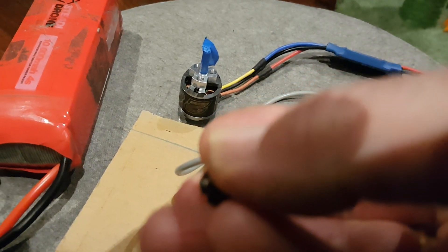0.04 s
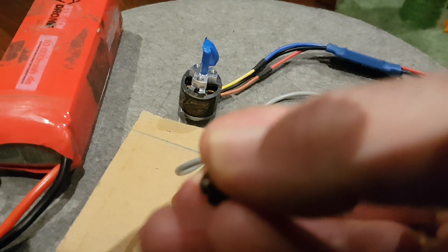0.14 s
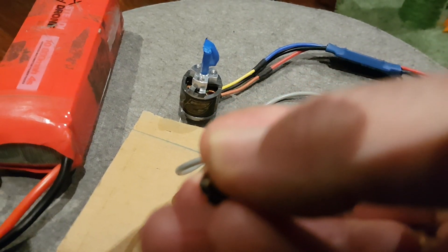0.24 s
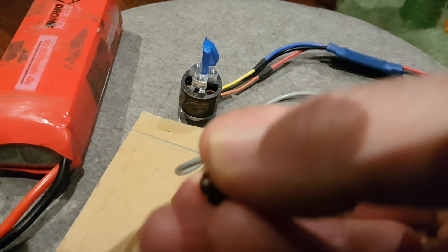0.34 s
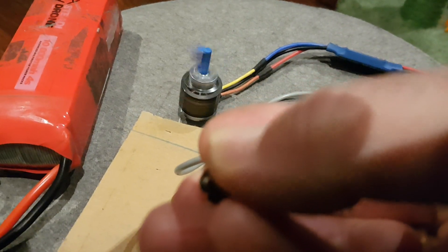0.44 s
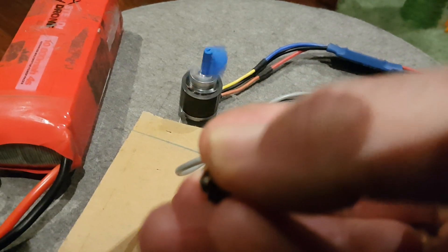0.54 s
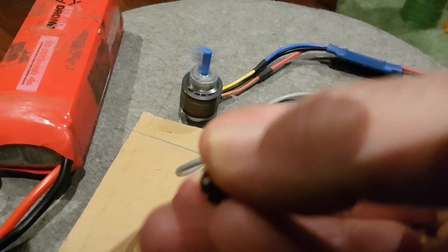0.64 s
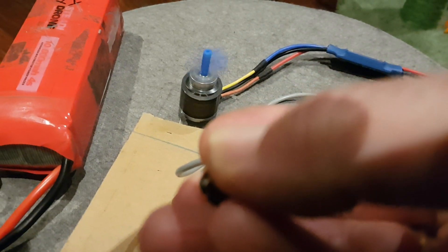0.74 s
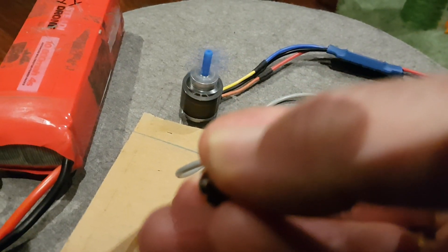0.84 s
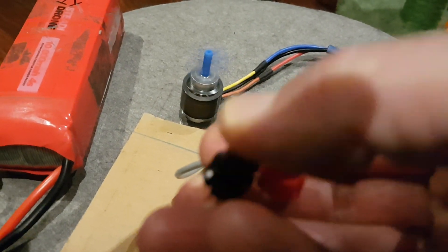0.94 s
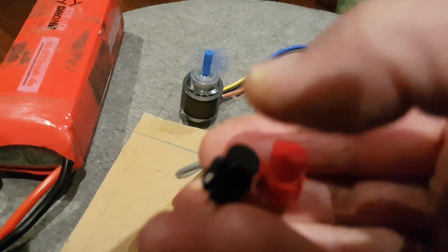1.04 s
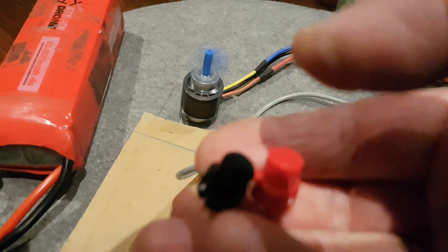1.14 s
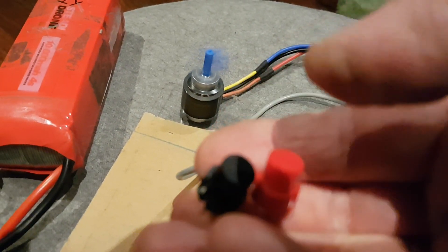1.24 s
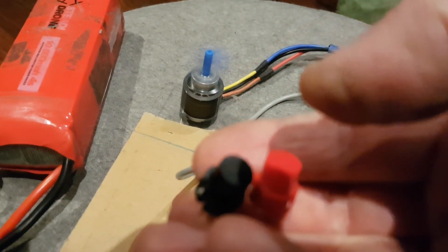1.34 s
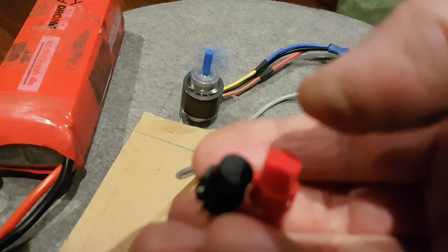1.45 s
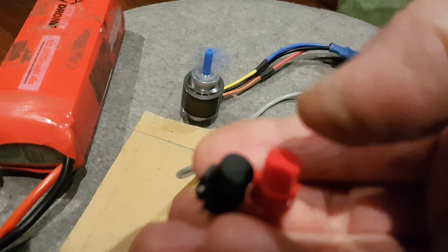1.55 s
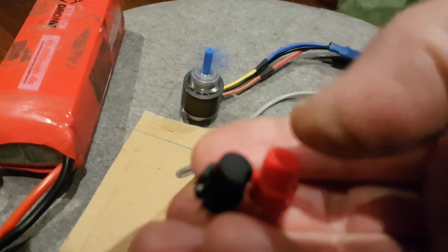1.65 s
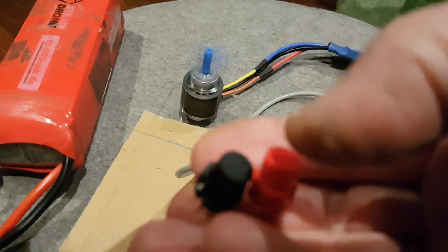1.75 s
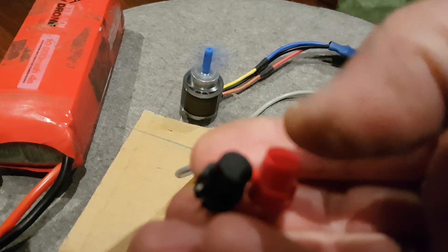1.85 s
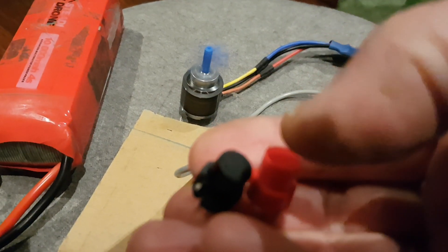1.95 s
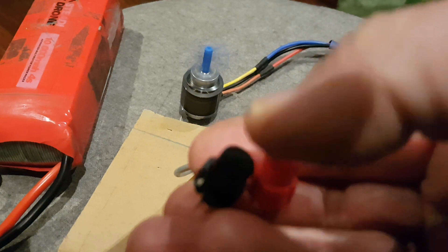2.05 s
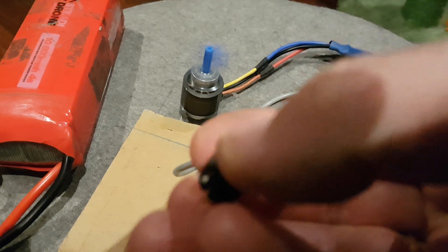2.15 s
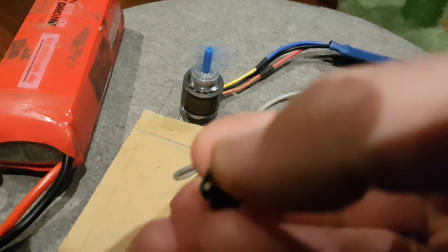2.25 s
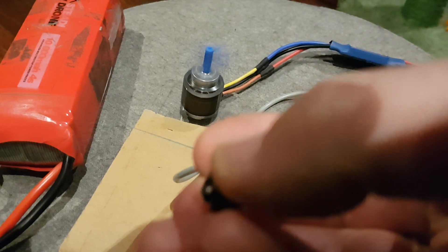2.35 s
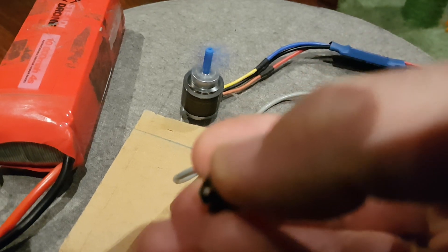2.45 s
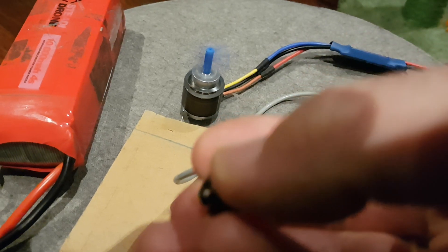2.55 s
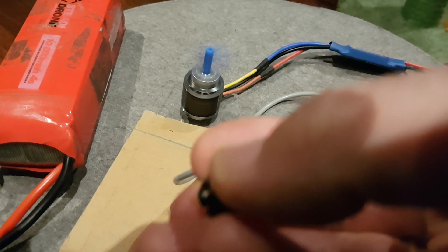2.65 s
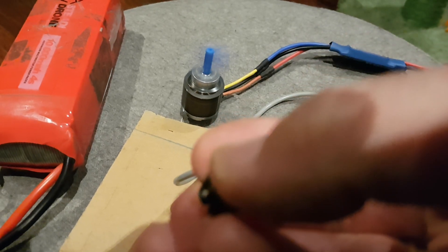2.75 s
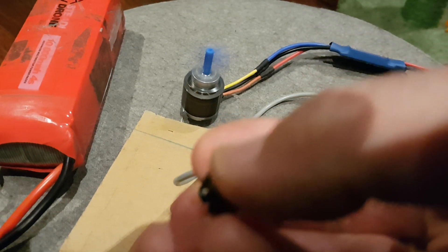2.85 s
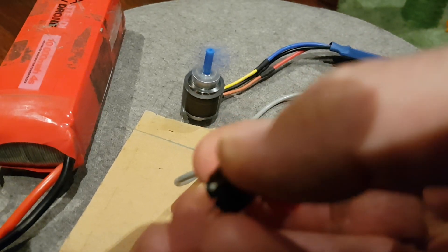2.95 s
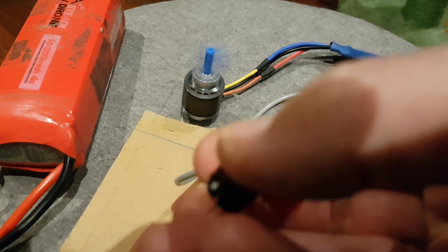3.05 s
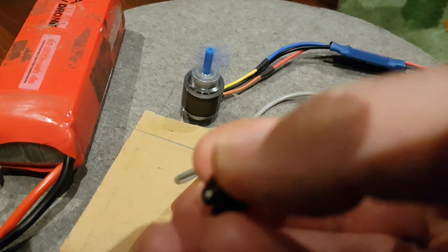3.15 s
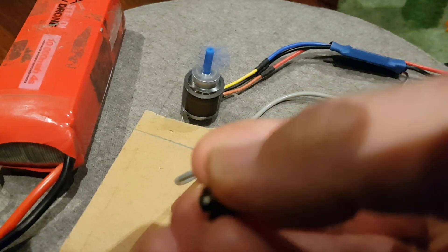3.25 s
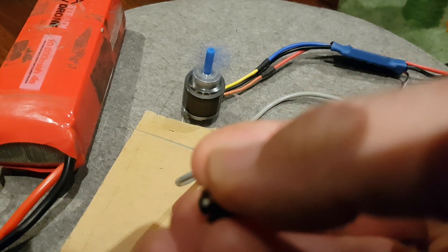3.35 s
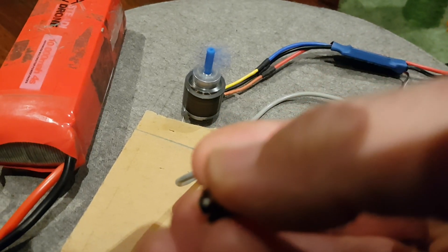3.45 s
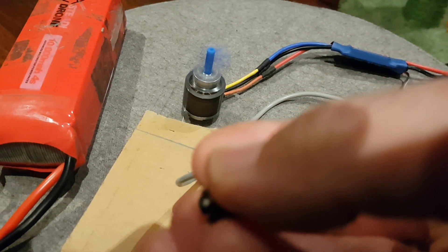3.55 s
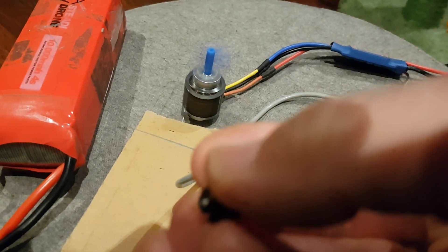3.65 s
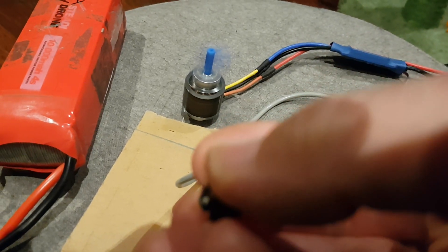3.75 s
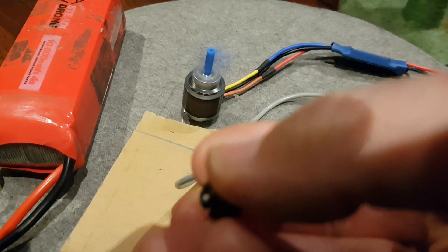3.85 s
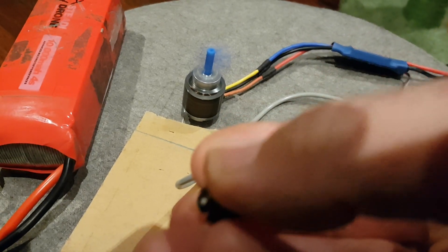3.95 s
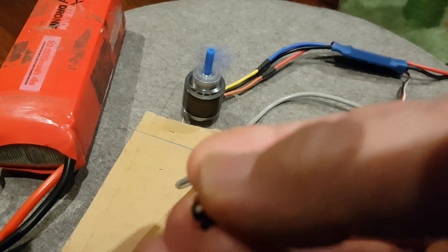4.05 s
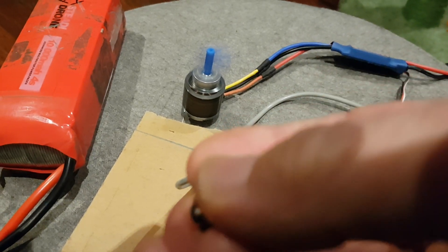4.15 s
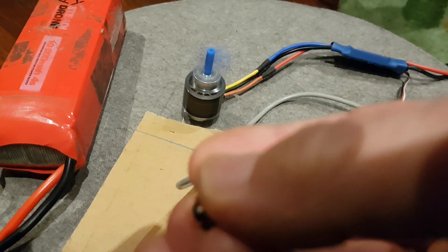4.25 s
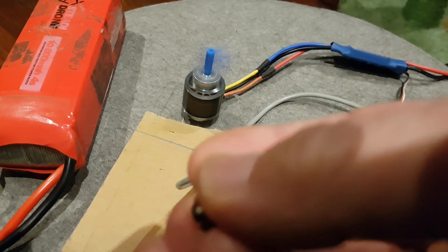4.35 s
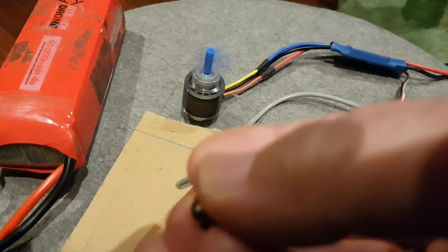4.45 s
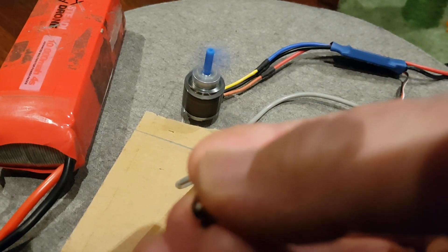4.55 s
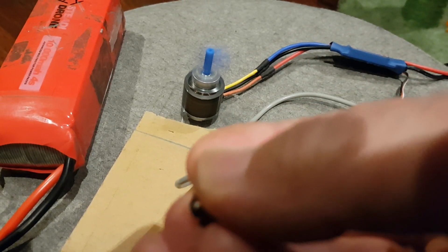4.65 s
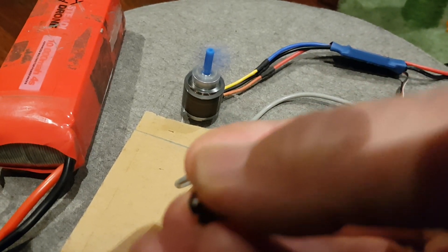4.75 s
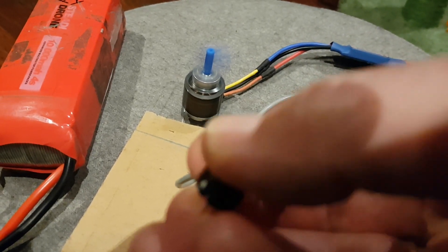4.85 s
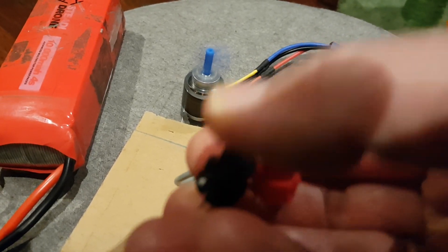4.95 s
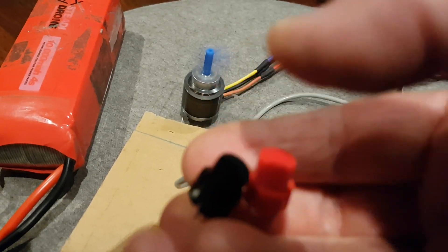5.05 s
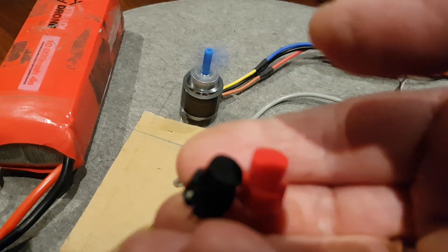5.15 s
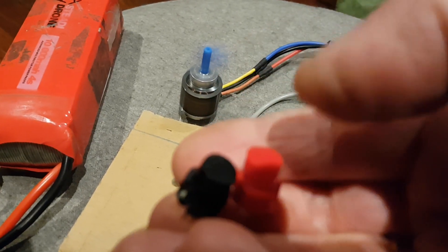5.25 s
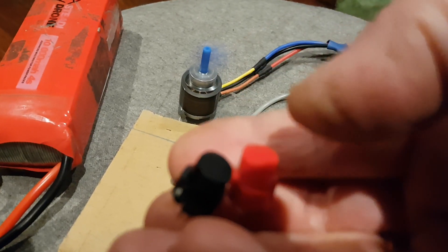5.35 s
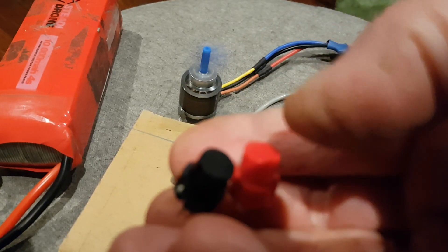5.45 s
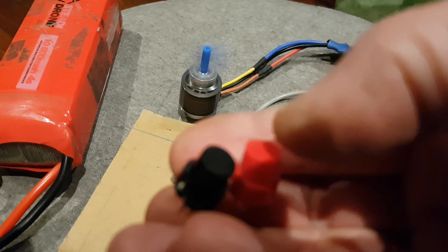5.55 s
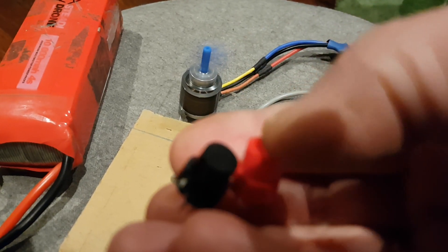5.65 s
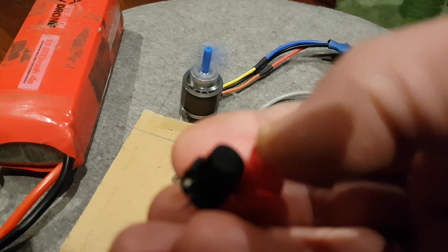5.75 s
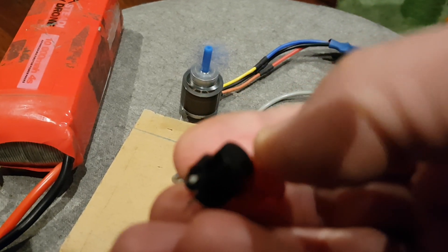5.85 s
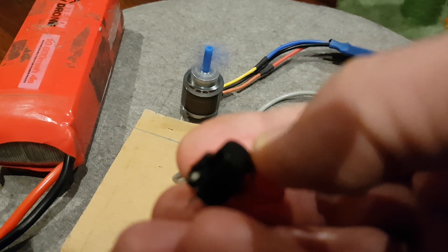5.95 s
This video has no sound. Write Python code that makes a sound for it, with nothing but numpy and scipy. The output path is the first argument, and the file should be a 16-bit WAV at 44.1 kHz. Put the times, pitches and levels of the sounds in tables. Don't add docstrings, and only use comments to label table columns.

```python
import sys
import numpy as np
from scipy import signal
from scipy.fft import rfft, irfft, next_fast_len
from scipy.io import wavfile
from scipy.ndimage import uniform_filter1d

SR = 44100
rng = np.random.default_rng(int(sys.argv[2]) if len(sys.argv) > 2 else 0)


def boost_factor(decibels):
    exponent = np.asarray(decibels, float) / 20
    return 10 ** exponent


def generate_wav(sig):
    pcm = np.round(np.clip(np.atleast_2d(sig).T, -1, 1) * 32767).astype(np.int16)
    wavfile.write(sys.argv[1], SR, pcm)


N = 264803
TIME = np.arange(N) / SR
HZ = np.fft.rfftfreq(next_fast_len(N + SR // 4), 1 / SR)
SIZE = 2 * (len(HZ) - 1)
TURN = 65536
ON_S, ODD_ON_S, LOCK_S = 0.412, 0.721, 0.773
PART_HZ, HIGH_HZ, FULL_HZ = 158, 182, 206


def shape(points):
    hz, db = np.transpose(points)
    return boost_factor(np.interp(np.log(HZ + 1), np.log(hz), db))


def rings(table):
    gain = 1
    for hz, width_hz, db in table:
        gain = gain * (1 + (boost_factor(db) - 1) / (1 + 2j * (HZ - hz) / width_hz))
    return gain


def colour(x, gain):
    return irfft(rfft(x, SIZE) * gain, SIZE)[:N]


def unit(x):
    return x / np.sqrt(np.mean(np.abs(x) ** 2))


def noise(points):
    return unit(colour(rng.standard_normal(N), shape(points)))


def walk(rate):
    k = int(SR / rate)
    held = np.repeat(rng.standard_normal(N // k + 1), k)
    return 1.309 * uniform_filter1d(uniform_filter1d(held, k), k)[:N]


def since(start_s, decay_s):
    return np.exp(-np.maximum(TIME - start_s, 0) / decay_s)


def per_turn(gains, turns, spread=1.0):
    phases = np.exp(2j * np.pi * spread * rng.random(TURN))
    table = np.fft.ifft(gains * phases) * TURN
    return table[..., (turns % 1 * TURN).astype(int)]


# pitch_hz, level_db
ROOM_TONE = [(15, -31), (25, -55), (33, -27), (175, -1.5), (270, -5), (301, 2), (335, -3.5), (545, -6.5),
             (624, -1), (734, -8), (2000, -17.5), (7110, -38), (16000, -33.5)]


def room():
    shared = noise(ROOM_TONE)
    return boost_factor(-62.5) * np.array([0.62 * shared + 1.32 * noise(ROOM_TONE) for _ in range(2)])


# start_s, peak_db, pitch_hz, t60_s
NUDGES = [
    (0.534, -48, 75, 0.015),
    (3.389, -49, 77, 0.044),
    (5.988, -56, 76, 0.041),
]


def bumps():
    out = np.zeros(N)
    for s, db, hz, t60 in NUDGES:
        t = np.maximum(TIME - s, 0)
        out += boost_factor(db + 17.5) * np.sin(2 * np.pi * hz * t) * np.exp(-np.log(1000) * t / t60)
    return out * np.array([[1.2], [0.8]])


# pitch_hz, level_db
PORT_BASS = [(25, -14), (70, -0.5)]
# pitch_hz, level_db
NEAR_PATH = [(60, -4), (250, -10), (500, 0), (1000, 2), (1250, -4.5), (2100, -3), (2500, -12.5),
             (3200, -13), (4500, -12.5), (6000, -10.5), (7000, -21), (10000, -21.5), (14500, -18.5),
             (16000, -28.5)]
# pitch_hz, width_hz, level_db
CAN_RINGS = [(536, 120, 6.6), (654, 11, 1.1), (930, 145, 5.3), (1083, 170, 2.2), (1407, 285, 5),
             (1994, 112, 6.2), (2280, 267, 5.7), (3880, 15, 0.87), (4555, 25.5, 10), (9860, 1130, 9.5),
             (14100, 220, 3.5)]


def path_to_phone():
    port_ring = 1 + 1.3 / (1 + 2j * (HZ - 15450) / 300)
    return shape(NEAR_PATH) * rings(CAN_RINGS) * shape(PORT_BASS) * port_ring


# time_s, shaft_hz
KNOB_TURNS = [(0.8, 157.5), (1.37, 152.6), (1.42, 155.9), (1.65, 155.9), (1.73, 154.2), (2.11, 154.6),
              (2.41, 153.4), (2.49, 156.4), (2.77, 176.3), (2.9, 179.8), (3.37, 178.6), (3.62, 187.4),
              (4.06, 187.3), (4.21, 188.7), (4.5, 196.8), (4.59, 206.1), (6.0, 206.1)]


def speed():
    hand_s, creep_hz, creep_rise_s, inertia_s = 0.07, 27.556, 0.05, 0.113
    asked = np.interp(TIME, *np.transpose(KNOB_TURNS))
    knob = uniform_filter1d(asked, size=int(hand_s * SR), mode="nearest")
    creep = creep_hz * (1 - 0.3 * since(ON_S, creep_rise_s))
    return knob - (knob - creep) * since(LOCK_S, inertia_s)


def shaft_turns(hz, blind, rush):
    jitter = 0.00018 * walk(20.) + 0.0303 * blind * walk(60.03) + 0.012 * rush * walk(120.)
    return np.cumsum(hz * (1 + jitter)) / SR


# shaft_hz, hum_db, left_minus_right_db
PAD_HUM = [(27, -65, 1), (64, -63, -12), (91, -51.5, -8), (147, -37, -7), (153, -39, -8),
           (174.2, -26, -6.5), (180, -32, -3.5), (193.5, -27.5, -5.5), (206, -29.5, -4),
           (205.8, -26.5, -4.5)]


def unbalance_hum(hz, turns):
    speeds, levels, pans = np.transpose(PAD_HUM)
    hum_db, pan_db = np.interp(hz, speeds, levels), np.interp(hz, speeds, pans)
    level = boost_factor(hum_db + 0.5 * walk(40.)) * np.sqrt(2)
    hum = (TIME > ON_S) * level * np.sin(2 * np.pi * turns + 0.12 * walk(40.))
    return colour(hum, shape(PORT_BASS)) * boost_factor(np.array([pan_db, -pan_db]) / 2)


# start_s, peak_db, bright_db
SNAPS = [(0.416, -47, 11), (0.447, -39, -13), (0.477, -34, -10), (0.517, -32.5, -16), (0.558, -35, -14),
         (0.595, -36.5, -14), (0.631, -55, -7), (0.715, -38, -19), (0.751, -55, -19), (0.767, -48, -15),
         (0.781, -41, 2), (0.799, -41, -12)]


def judder():
    out = np.zeros(N)
    t = np.arange(400) / SR
    for s, db, bright_db in SNAPS:
        i = int(s * SR)
        rough = rng.standard_normal(400) * np.exp(-t / 0.0044)
        knock = uniform_filter1d(unit(rough), size=6)
        dull = uniform_filter1d(uniform_filter1d(knock, size=16), size=16)
        out[i:i + 400] += boost_factor(db) * (dull + boost_factor(bright_db) * knock)
    return out


def lurching(blind, rush):
    snap_db, snap_s = 35, 0.014
    lurch = boost_factor((0.56 * blind + 1.1 * rush) * walk(110.3))
    jolts = 1
    for s, db, _ in SNAPS:
        jolts = jolts + boost_factor(db + snap_db) * (TIME > s) * np.exp(-np.abs(TIME - s) / snap_s)
    return lurch * jolts


# pitch_hz, level_db
AIR = [(25, -26), (60, -3.5), (120, 12.5), (200, 12), (600, -2.5), (1000, -5.5), (2000, -3), (4000, 3.5),
       (8000, 3.5), (12000, -18), (16000, -17.5)]
# pitch_hz, level_db
RATTLE = [(200, -24), (450, -51), (640, 10.5), (780, -5), (1000, 2.5), (1500, -18), (2350, -4.5),
          (3000, -14), (6000, -17), (9000, -40)]


def air_hiss(whine_db, gate, lurch, blind, rush):
    air = (1 - blind) * boost_factor(-4 * rush) * noise(AIR)
    return boost_factor(whine_db - 0.5) * gate * lurch * (air + 1.7 * blind * noise(RATTLE))


def fizz(whine_db, gate, blind, rush, load, full):
    running_db = whine_db - 4.5 + 15.7 * rush + 4.9 * load - full
    level = blind * boost_factor(SWITCH_BLIND_DB + 19.5) + (1 - blind) * boost_factor(running_db)
    return level * gate * noise([(9000, -12.5), (9900, -3), (10400, 2.5), (11000, 1), (16000, 3)])


# ball_pass_multiple, shaft_multiple, slow_db, fast_db
BALL_LINES = [(1, 0, -40, -6.5), (1, 1, -30, -1.5), (1, 2, -21, -9.5), (1, 3, -15, -11), (1, 4, -6, -34),
              (2, -2, -58, -20), (2, -1, -16, -12), (2, 0, -3.5, -3), (2, 1, -5.5, -10), (3, 0, -8.5, -7.5),
              (4, 0, -5.5, -23)]


def bearing(hz, turns):
    balls_per_turn = 3.178
    fast = np.clip((hz - 154) / 52, 0, 1)
    out = 0
    for balls, shaft, slow_db, fast_db in BALL_LINES:
        cycles = (round(balls) * balls_per_turn + round(shaft)) * turns + rng.random()
        out = out + boost_factor(slow_db + (fast_db - slow_db) * fast) * np.sin(2 * np.pi * cycles)
    return out * boost_factor(2.0 * walk(11.0))


SWITCH_BLIND_DB = -61.5


def switching_level(hz, load):
    held = 1 - since(LOCK_S, 0.02)
    running_db = -55 + 4.5 * load - 2 * np.log2(hz / FULL_HZ)
    return held * running_db + (1 - held) * SWITCH_BLIND_DB


SWITCH_LINES = [(1, 0), (1, 1), (1, 8), (1, 9), (1, 11), (1, 12), (1, 13), (1, 22), (1, 24), (1, 26),
                (1, 28), (1, 30), (1, -35), (1, -36), (2, 0), (2, -1), (2, 1), (2, -8), (2, -12), (2, -14),
                (2, -18), (2, -30)]
SWITCH_LINE_DB = [3, -16, -7.5, -7, -16, -4, -20, -8, -3, -14, -15, -3, -20.5, -22, -4, -14, -12, -9, -2.5,
                  -11, -14, -15]
WEAK_LINES = [
    np.arange(-6, 44),
    np.arange(-36, 2),
]
# time_s, pitch_hz
SWITCH_TONE = [(.4, 7790), (.705, 7790), (.72, 7850), (.9, 7790), (1.1, 7720), (1.4, 7705), (3.45, 7705),
               (3.65, 7680), (6, 7680)]


def switching(hz, load, full, turns):
    odd_on = TIME > ODD_ON_S
    levels = [odd_on * boost_factor(4 - 4 * load), boost_factor(1 - 3.5 * load * odd_on)]
    phase = np.cumsum(np.interp(TIME, *np.transpose(SWITCH_TONE))) / SR
    out = 0
    for m, level, weak in zip((1, 2), levels, WEAK_LINES):
        gains = np.zeros(TURN)
        gains[weak] = boost_factor(-23.0 + 7.4 * rng.standard_normal(len(weak)))
        for (carrier, k), line_db in zip(SWITCH_LINES, SWITCH_LINE_DB):
            gains[k] += boost_factor(line_db) * (carrier == m)
        pattern = per_turn(gains, turns)
        waver = 0.21 * walk(7.57) * per_turn(gains * (np.arange(TURN) > 0), turns)
        out = out + level * ((pattern + waver) * np.exp(2j * np.pi * m * phase)).real
    return out * (1 - full) * boost_factor(0.67 * walk(9.))


def whine_level(hz, blind, rush):
    blind_db = -56.5 - 25 * since(ON_S, 0.037)
    running_db = -36.5 + 6 * np.log2(hz / FULL_HZ) + 0.5 * rush
    return blind * blind_db + (1 - blind) * running_db


# shaft_multiple, part_speed_db, high_speed_db, full_power_db
FORCES = [(2, 14.5, 5.5, 3), (3, 2.5, 4, 1), (4, 1.5, 5.5, 4.5), (5, 2, 3, -2), (6, 4.5, 2, 4),
          (7, 2, -7, 2.5), (8, -0.5, 3, 7), (9, 10, 5, 11.5), (10, 11.5, 3.5, 10), (11, 5, 5, 5.5),
          (12, 9.5, 7.5, 3), (13, 0.5, -5, -2), (14, -2.5, -24, -.5), (15, -2, 0, -3), (18, 2, -1.5, -16),
          (19, 3, -3, -4), (20, -0.5, 0, 3.5), (21, 3.5, 8, -19), (22, 0, 2, -24), (23, -9, 3, -19),
          (24, 8, 16.5, 7), (25, 8, 1.5, -11), (26, 7, 7, 4), (27, 6, 8, 8), (28, 4, 10, -12),
          (29, 13.5, 8, -10), (30, -1, -4, -8), (33, 6, -17, -6), (36, 15.5, 14.5, 20), (37, 7, 12, 8.5)]
HIGH_MULTIPLES = [48, 51, 54, 57, 60, 64, 66, 72]
# chopped_db, full_power_db
HIGH_MULTIPLE_DB = [(6, -25), (7, -16), (-3, 4), (-8, 0), (12, 9), (-7, 13), (-10, 6), (2, 12.5)]
# shaft_multiple, level_db
TOOTH_PULL = [(2, -8), (3, -20), (4, -14), (5, -9), (9, 9.5), (10, 6.5), (12, 5.5), (24, 15.5), (33, 1),
              (36, 14.5), (39, 5), (48, 7), (60, 9.5)]


def whine(hz, full, turns):
    gains = np.zeros((4, TURN))
    gains[:, 2:76] = boost_factor(-5.0 - 8.0 * np.arange(74) / 74 + 4.5 * rng.standard_normal(74))
    for k, *db in FORCES:
        gains[1:, int(round(k))] = boost_factor(np.array(db))
    for k, (chopped_db, full_db) in zip(HIGH_MULTIPLES, HIGH_MULTIPLE_DB):
        gains[1:3, k] = boost_factor(chopped_db)
        gains[3, k] = boost_factor(full_db)
    gains[0] = gains[1] * boost_factor(-13 * np.minimum(np.arange(TURN) / 16, 1) ** 2)
    for k, db in TOOTH_PULL:
        gains[0, int(round(k))] = boost_factor(db)
    slow = np.clip((150 - hz) / 22, 0, 1)
    high = np.clip((hz - PART_HZ) / (HIGH_HZ - PART_HZ), 0, 1)
    slip = boost_factor(3.5 * np.clip(hz / 30 - 1, 0.3, 1) * walk(90.))
    share = np.array([slow * slip, (1 - slow) * (1 - high), high * (1 - full), full])
    steady = per_turn(gains, turns, spread=0.57).real
    wobble = 0.21 * walk(14.) + 0.53 * slow * walk(59.87)
    return (share * (steady + wobble * per_turn(gains, turns).real)).sum(axis=0)


def strain(hz, load, full, turns):
    gain = boost_factor(18.) * load ** 2 * np.clip((hz - PART_HZ) / 6 + 1, 0, 1) * (1 - full) ** 2
    return gain * np.sin(2 * np.pi * 25 * turns)


# pitch_hz, width_hz, level_db
PAD_REFLECTION = [(351, 74, -7), (524.4, 62, -13.5), (689, 76, -23), (797, 27, 4.5), (955, 37, 4),
                  (1354, 110, -24), (1508, 31, 4), (1803, 85, -3), (2016, 20, 4), (2680, 82, -3),
                  (3905, 57, 6), (4483, 43, 9.5), (4167, 76, 7), (6300, 710, -9)]
# pitch_hz, left_minus_right_db
FAR_PATH = [(60, -12), (200, 0), (400, -5.5), (800, -4.5), (1300, 0.5), (2300, -5), (3000, -5.5),
            (4400, -20), (8100, -27), (11000, -23), (15000, -16)]


def scene():
    hz = speed()
    on = TIME > ON_S
    blind = np.clip((50 - hz) / 21, 0, 1)
    rush = np.clip((140 - hz) / 60, 0, 1)
    full = np.clip((hz - FULL_HZ) / 12 + 1, 0, 1)
    push_hz_s = np.maximum(np.gradient(hz) * SR, 0)
    load = np.tanh(push_hz_s / 40) * (TIME > LOCK_S)
    turns = shaft_turns(hz, blind, rush)
    whine_db = whine_level(hz, blind, rush)
    lurch = lurching(blind, rush)
    gate = 1 + 0.48 * (1 - blind) * np.cos(2 * np.pi * turns)

    hiss = [air_hiss(whine_db, gate, lurch, blind, rush) for _ in range(2)]
    sizzle = [fizz(whine_db, gate, blind, rush, load, full) for _ in range(2)]
    tones = whine(hz, full, turns) + strain(hz, load, full, turns) + (1 - blind) * bearing(hz, turns)
    tones = on * boost_factor(whine_db - 15.5) * lurch * tones
    switch = on * boost_factor(switching_level(hz, load) + 12.0) * switching(hz, load, full, turns)
    motor = colour(tones, rings(PAD_REFLECTION)) + switch + 0.3 * judder()

    path = path_to_phone()
    right = colour(motor + on * (hiss[0] + sizzle[0]), path)
    left_air = 0.35 * hiss[0] + 1.38 * hiss[1] + 2.7 * sizzle[1]
    left = colour(motor + on * left_air, path * shape(FAR_PATH))
    return np.array([left, right]) + unbalance_hum(hz, turns) + bumps() + room()


def band_limit(x):
    return signal.sosfilt(signal.butter(12, 16360, fs=SR, output="sos"), x)


def record(dry):
    cut = signal.ellip(10, 0.2, 60, 15650, fs=SR, output="sos")
    return band_limit(signal.sosfilt(cut, dry))


dry = scene()
out = record(dry)
generate_wav(out)
```